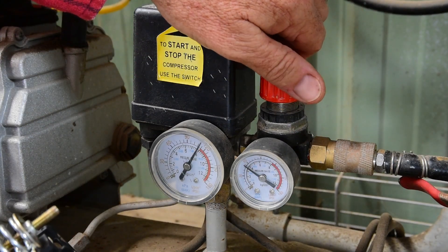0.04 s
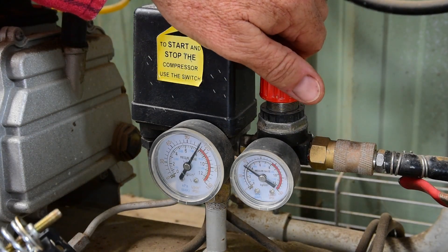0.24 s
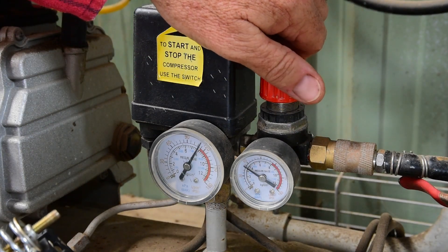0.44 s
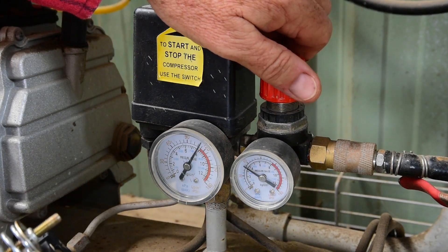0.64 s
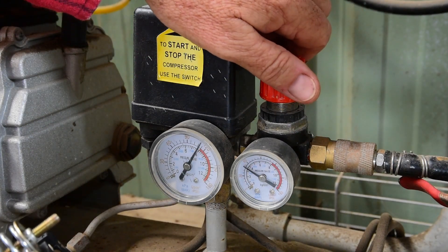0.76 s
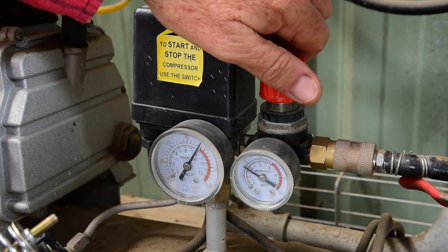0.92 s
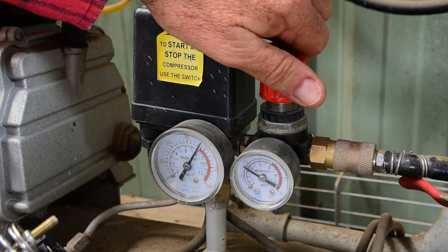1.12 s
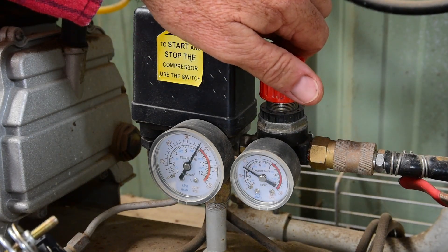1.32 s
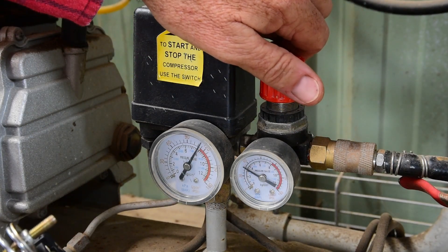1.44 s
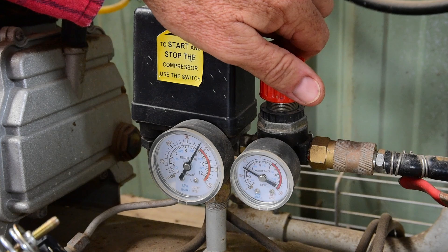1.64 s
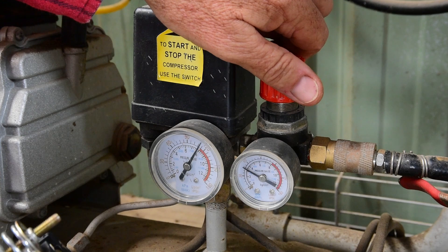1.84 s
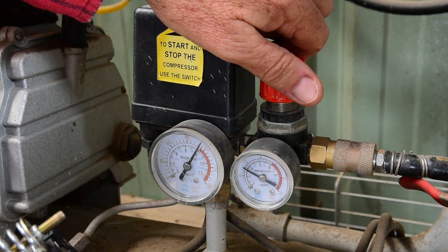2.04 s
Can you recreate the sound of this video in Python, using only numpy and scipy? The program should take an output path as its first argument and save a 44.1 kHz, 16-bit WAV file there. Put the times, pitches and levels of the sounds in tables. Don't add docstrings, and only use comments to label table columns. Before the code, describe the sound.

A loud, bright hiss of compressed air escapes continuously from a regulator vent, close to the microphone in a workshop; faint low bumps come early, then a plastic knob ticks and a sleeve scuffs near the end.

```python
import sys
import numpy as np
from scipy import signal
from scipy.fft import rfft, irfft, next_fast_len
from scipy.io import wavfile
from scipy.ndimage import uniform_filter1d, map_coordinates

SR = 44100
rng = np.random.default_rng(int(sys.argv[2]) if len(sys.argv) > 2 else 0)


def file_out(sig):
    cols = np.atleast_2d(sig).T
    lim = np.clip(cols, -1, 1)
    pcm = np.round(lim * 32767).astype(np.int16)
    wavfile.write(sys.argv[1], SR, pcm)


def nominal_scale(level):
    x = np.asarray(level, float) / 20
    return 10 ** x


N = 91595
TIME = np.arange(N) / SR


def unit(x):
    return x / np.sqrt(np.mean(x ** 2) + 1e-20)


def along(points, hz):
    f, db = np.transpose(points)
    return nominal_scale(np.interp(np.log(hz + 1), np.log(f + 1), db))


def peak(hz, centre, width, db):
    return nominal_scale(db) * 1j * hz * width / (centre ** 2 - hz ** 2 + 1j * hz * width)


def wobble(rate):
    return map_coordinates(rng.standard_normal(N // 100), [TIME * rate])


def filtered(x, response):
    m = next_fast_len(N + 8192)
    return irfft(rfft(x, m) * response(np.fft.rfftfreq(m, 1 / SR)), m)[:N]


def coloured(noise, curve):
    return filtered(noise, lambda hz: along(curve, hz))


def patchy(patchy_db):
    z = signal.stft(rng.standard_normal(N), nperseg=512)[2]
    field = uniform_filter1d(rng.standard_normal(z.shape), size=4, axis=0)
    field = uniform_filter1d(field, size=4, axis=1)
    return signal.istft(z * nominal_scale(patchy_db * unit(field)), nperseg=512)[1][:N]


def ringing(modes, sway_db):
    def response(hz):
        power = 0
        for centre, width, db in modes:
            skirt = np.sqrt(1 + ((hz - centre) / width) ** 2)
            power = power + abs(peak(hz, centre, width, db)) ** 2 / skirt
        return np.sqrt(power)
    return filtered(patchy(sway_db), response)


def bursts(rows):
    return sum(nominal_scale(db) * np.exp(-(2 * (TIME - s) / length) ** 2) for s, length, db in rows)


# [f/Hz, level/dB per Hz]
ROOM_COLOUR = [(20, -29), (70, 1), (150, -2), (300, -2), (550, 0.5), (1200, -12.5), (2500, -14),
               (5000, -13)]


def room_air():
    return nominal_scale(-44.5) * unit(coloured(patchy(patchy_db=1.0), ROOM_COLOUR))


# [t/s, length/s, level/dB]
PUFF_TIMES = [
    (.14, .13, -51),
    (.3, 0.14, -56),
    (.46, 0.11, -47.5),
    (.56, 0.13, -48.5),
    (.70, .1, -50),
    (.81, 0.067, -49.5),
    (1.82, 0.057, -46),
]
# [f/Hz, level/dB per Hz]
PUFF_COLOUR = [(18, -30), (35, -5), (60, 3), (95, -11), (160, -36)]


def microphone_puffs():
    return bursts(PUFF_TIMES) * unit(coloured(rng.standard_normal(N), PUFF_COLOUR))


# [t/s, length/s, level/dB]
SCUFF_STROKES = [
    (1.8, 0.086, -49),
    (1.885, 0.11, -42.5),
    (1.95, 0.082, -41.5),
]
# [f/Hz, level/dB per Hz]
CLOTH_COLOUR = [(120, -34), (300, -2.5), (550, 0.5), (1000, -7.5), (1400, 3.5), (2000, -16), (3500, -23)]


def sleeve():
    grain = nominal_scale(2.5 * wobble(rate=96))
    rub = grain * coloured(rng.standard_normal(N), CLOTH_COLOUR)
    return bursts(SCUFF_STROKES) * unit(rub)


# [t/s, length/s, level/dB]
TANK_RUBS = [
    (.31, .2, -53),
    (.48, .14, -52),
    (.63, .1, -51),
    (.8, .06, -54),
    (1.79, .08, -51),
    (1.88, .09, -49),
    (2.06, .06, -53),
]
# [f/Hz, width/Hz, level/dB]
TANK_MODES = [(275, 40, 0), (345, 45, -1)]


def tank():
    return bursts(TANK_RUBS) * unit(ringing(TANK_MODES, sway_db=0.0))


# [f/Hz, width/Hz, level/dB]
KNOB_MODES = [(400, 450, 0), (1370, 160, -1), (900, 400, -7)]


def knob():
    tick_s, push_s, level_db = 1.712, 0.00022, -20
    push = np.exp(-((TIME - tick_s) / push_s) ** 2)
    tick = filtered(push, lambda hz: sum(peak(hz, *mode) for mode in KNOB_MODES))
    return -nominal_scale(level_db) * tick / abs(tick).max()


# [t/s, level/dB]
FLOW_COURSE = [
    (0.0, -13),
    (0.09, -14),
    (1.21, -14),
    (2.06, -13.5),
    (2.07, -13),
]


def flow():
    s, db = np.transpose(FLOW_COURSE)
    eddies_db = 0.65 * wobble(rate=40)
    surges_db = 0.1 * wobble(rate=14)
    return nominal_scale(np.interp(TIME, s, db) + eddies_db + surges_db)


# [f/Hz, level/dB per Hz]
JET_COLOUR = [(60, -34), (1500, -32), (4500, -34), (6200, -26.5), (8700, -24.5), (10800, -19.5),
              (13500, -8), (15700, -10)]


def turbulence():
    return coloured(patchy(patchy_db=1.3), JET_COLOUR)


CAVITY_CENTRES = [2200, 2390, 2500, 2600, 6770, 7000, 7120, 7180, 7285, 7500]
# [width/Hz, level/dB]
CAVITY_SHAPES = [(50.7, -20), (69.5, -10.5), (500, -22), (50, -16.5), (60, -19.5), (80, -13), (500, -17.5),
                 (84, -7), (49.7, -18.5), (100, -16)]


def cavity():
    return ringing(np.column_stack([CAVITY_CENTRES, CAVITY_SHAPES]), sway_db=0.9)


HOSE_CENTRES = [935, 1860, 2900, 3310, 4240, 4890, 5750]
# [width/Hz, level/dB]
HOSE_SHAPES = [(60, -25), (90, -29), (150, -26), (104, -26), (96, -29), (90, -32), (200, -29)]


def hose():
    return ringing(np.column_stack([HOSE_CENTRES, HOSE_SHAPES]), sway_db=2.5)


NOZZLE_CENTRES = [9680, 10160, 10510, 11200, 11480, 11900, 12280, 12760, 13000, 13190, 13535, 14380, 14680,
                  15100]
# [width/Hz, level/dB]
NOZZLE_SHAPES = [(440, -14), (148, -5.5), (190, -11.5), (200, -8), (300, -1), (300, -5.5), (110, -0.5),
                 (120, -8), (200, -3.5), (200, -4), (50, -3), (400, -9.5), (140, 2.5), (200, -10.5)]


def nozzle():
    return ringing(np.column_stack([NOZZLE_CENTRES, NOZZLE_SHAPES]), sway_db=0.5)


def jet():
    return flow() * unit(turbulence() + cavity() + hose() + nozzle())


def scene():
    background = room_air() + microphone_puffs()
    handling = sleeve() + tank() + knob()
    return (background + handling + jet())[None]


def band_limit(x):
    return signal.sosfilt(signal.butter(12, 15750, fs=SR, output="sos"), x)


def record(dry):
    return band_limit(dry)


dry = scene()
out = record(dry)
file_out(out)
```